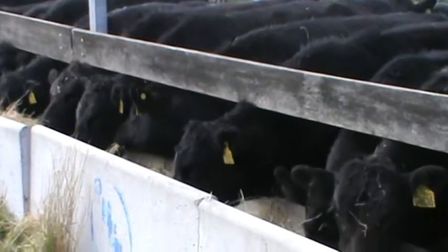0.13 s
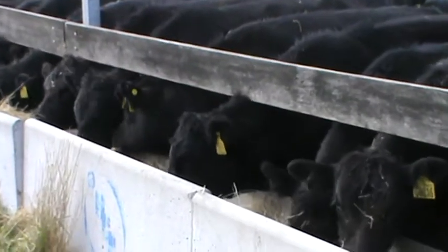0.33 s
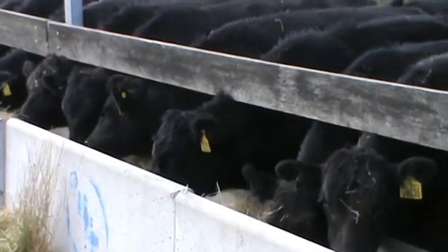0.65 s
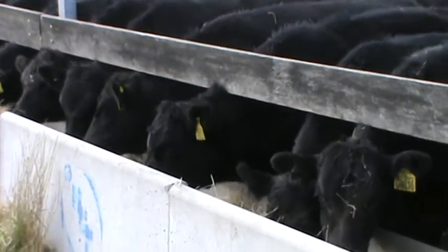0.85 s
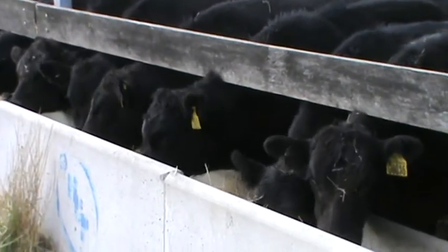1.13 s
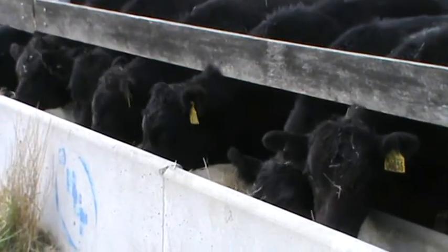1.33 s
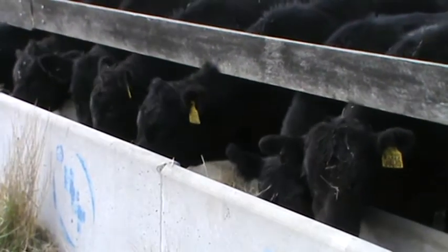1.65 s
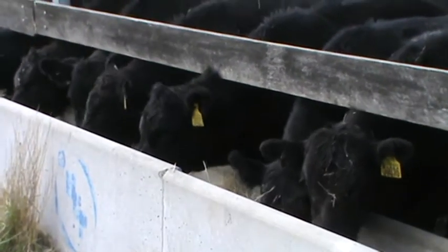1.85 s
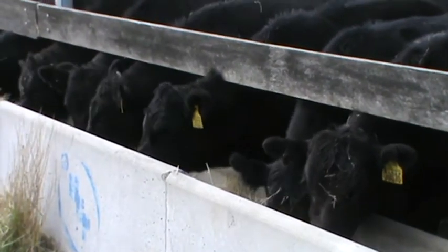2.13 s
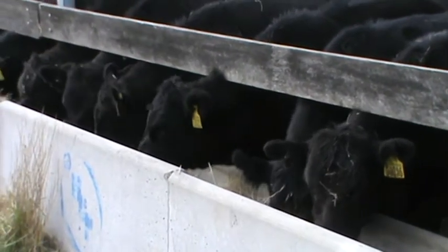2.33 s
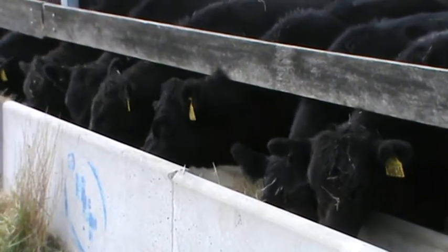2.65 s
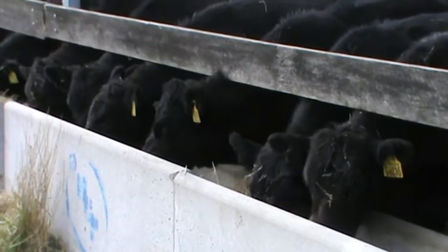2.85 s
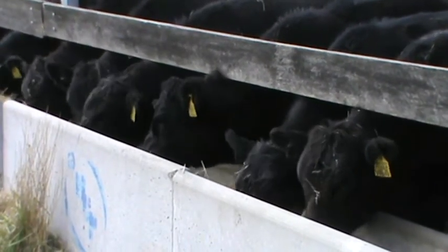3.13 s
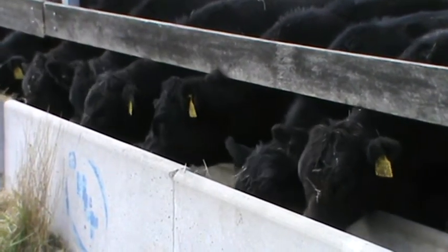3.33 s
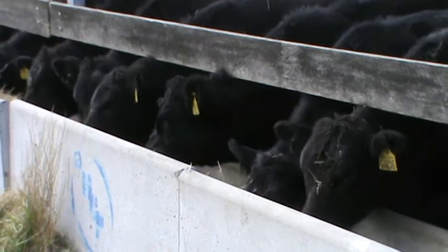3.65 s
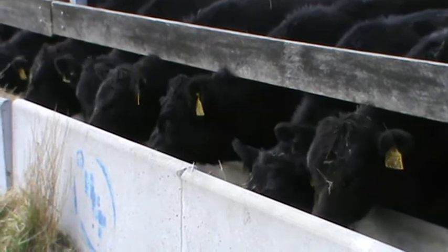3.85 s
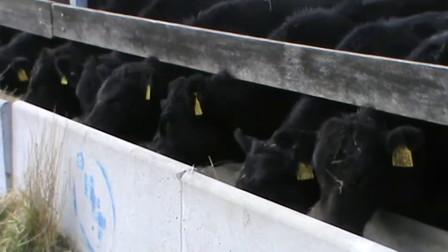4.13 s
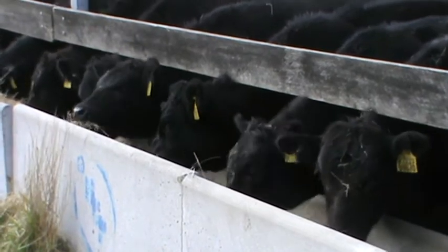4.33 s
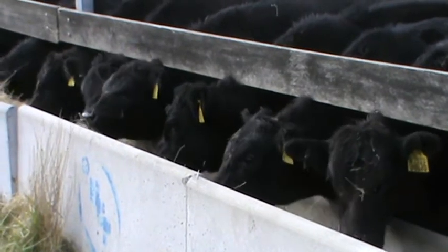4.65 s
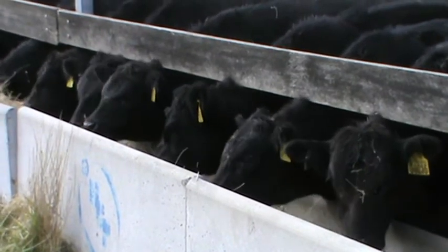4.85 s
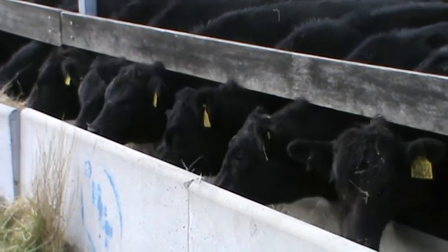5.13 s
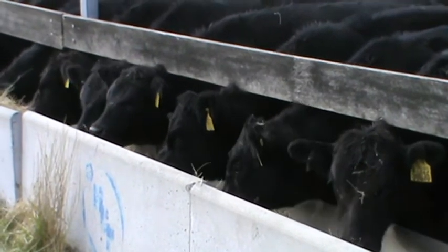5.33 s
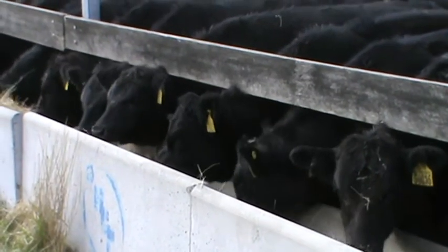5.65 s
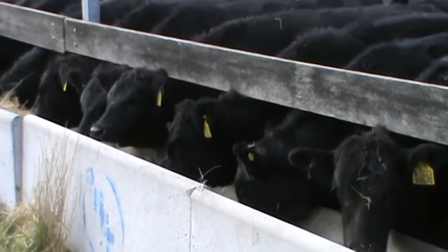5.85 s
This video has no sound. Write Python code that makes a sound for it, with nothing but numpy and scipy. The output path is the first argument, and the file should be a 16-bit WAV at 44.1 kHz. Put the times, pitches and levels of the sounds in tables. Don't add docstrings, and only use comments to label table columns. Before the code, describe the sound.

A young cow bawls loudly on the left, then another gives a lower drawn-out moo, amid wind buffeting and feed rustles in a yard.

```python
import sys
import numpy as np
from scipy import signal
from scipy.fft import rfft, irfft, next_fast_len
from scipy.io import wavfile
from scipy.ndimage import uniform_filter1d

SR = 44100
rng = np.random.default_rng(int(sys.argv[2]) if len(sys.argv) > 2 else 0)


def store_pcm(level_fs):
    pcm = np.round(np.clip(level_fs, -1, 1) * 32767).astype(np.int16)
    wavfile.write(sys.argv[1], SR, np.atleast_2d(pcm).T)


def how_loud(loudness_db):
    steps = np.asarray(loudness_db, float) / 20
    return 10 ** steps


N = 264159
HOP = 128


def rms_one(x):
    return x / np.sqrt(np.mean(x ** 2) + 1e-20)


def at_hz(points, hz):
    points_hz, values = np.transpose(points)
    return np.interp(np.log(hz), np.log(points_hz), values)


def along(rows, t):
    s, *columns = np.transpose(rows)
    return [np.interp(t, s, c) for c in columns]


def span(rows):
    s = np.transpose(rows)[0]
    start = int(s[0] * SR)
    t = np.arange(start, int(s[-1] * SR)) / SR
    edges = np.clip(np.minimum(t - s[0], s[-1] - t) / 0.012, 0, 1)
    return start, along(rows, t), edges


def place(x, start):
    return np.pad(x, (start, N - start - len(x)))


def band(x, low_hz, high_hz):
    edges_hz = [low_hz, min(high_hz, SR / 2.2)]
    return signal.sosfilt(signal.butter(2, edges_hz, "band", fs=SR, output="sos"), x)


def drift(rate_hz, size=N):
    r = np.exp(-2 * np.pi * rate_hz / SR * 20)
    noise = rng.standard_normal(size // 20 + 3002)
    slow = signal.lfilter([1], [1, -2 * r, r * r], noise)[3000:]
    return np.interp(np.arange(size) / 20, np.arange(len(slow)), rms_one(slow - slow.mean()))


def causal(log_gain):
    quefrency = irfft(log_gain, axis=0)
    half = len(quefrency) // 2
    quefrency[1:half] *= 2
    quefrency[half + 1:] = 0
    return np.exp(rfft(quefrency, axis=0))


def yard():
    # hz, density_db_per_hz
    spectrum = [(13, -37), (22, -2), (105, -1.5), (181, 3), (289, -1.5), (435, -3), (840, 1.5),
                (1860, -5.5), (2070, -4.5), (3040, -10), (7300, -19), (12600, -27.5), (14100, -21.5),
                (15300, -15)]
    # start_s, level_db
    level_rows = [(0.0, -55), (0.33, -57), (0.78, -51.5), (2.5, -54.5), (3.1, -52), (3.639, -54.5),
                  (3.8, -57), (4.99, -61.5), (5.99, -59.5)]
    # hz, likeness_0_to_1
    likeness = [(60, 1), (380, 0.42), (950, 0.32), (2400, 0.013), (6000, 0.032), (9000, 0.62), (12000, 1)]
    out, together = 0, drift(30)
    edges_hz = 20 * 2 ** np.arange(0, 9.7, .4)
    white = rng.standard_normal((2, 2, N))
    for k, (low, high) in enumerate(zip(edges_hz, edges_hz[1:])):
        mid, side = band(white[k % 2], low, high)
        hz = np.sqrt(low * high)
        alike = np.clip(at_hz(likeness, hz), 0, 0.98)
        patchy_db = 1.1 / (1 + hz / 3000)
        gain = how_loud(at_hz(spectrum, hz) + patchy_db * (together + drift(36)))
        out = out + gain * (np.sqrt(1 + alike) * mid + np.sqrt(1 - alike) * side * [[1], [-1]])
    level_db, = along(level_rows, np.arange(N) / SR)
    return rms_one(out) * how_loud(level_db + 10)


def hiss():
    noise = rng.standard_normal(N) + 0.37 * rng.standard_normal((2, N))
    return how_loud(-61.5) * rms_one(band(noise, 8500, 15000))


def whine():
    # pitch_hz, level_db
    tones = [
        (15525, -76),
        (15625, -64),
    ]
    out, t = np.zeros(N), np.arange(N) / SR
    for hz, db in tones:
        level_db = db + .8 * drift(7.2) + 1.7 * drift(45)
        out += np.sqrt(2) * how_loud(level_db) * np.sin(2 * np.pi * hz * t)
    return out


def insect_trill():
    # pitch_hz, level_db, end_s
    trill = (6650, -62, .17)
    hz, db, end_s = trill
    t = np.arange(N) / SR
    fade = np.clip((end_s - t) / .005, 0, 1)
    return how_loud(db + 3.5 * drift(60)) * np.sin(2 * np.pi * hz * t) * fade


def rustles():
    # start_s, peak_db, centre_hz, half_width_octaves, decay_t60_s
    events = [(.0, -33, 1110, 0.33, 0.076), (0.165, -41, 2250, 0.54, 0.026), (.43, -52, 6860, 0.25, 0.28),
              (.45, -57, 9700, .3, .25), (0.866, -27, 170, 2.7, 0.1), (1.699, -23, 133.1, 0.6, 0.3),
              (2.315, -23.5, 232, 0.33, 0.13), (2.6772, -25, 1670, 0.64, 0.048),
              (1.94, -47, 10800, 0.36, 0.076), (4.072, -39, 800, 0.95, 0.044),
              (4.13, -44.5, 4560, 1.3, 0.098), (4.272, -47, 940, 1.9, 0.033),
              (4.326, -42, 624, 0.17, 0.093), (4.569, -45.5, 900, 0.72, 0.058),
              (4.643, -39, 690, 1.05, 0.078), (4.995, -39, 1510, 0.26, 0.026),
              (5.45, -47.5, 3000, 1.2, 0.17), (5.586, -45.5, 736, 0.42, 0.056),
              (5.874, -35.5, 800, 0.99, 0.11)]
    out, t = np.zeros((2, N)), np.arange(int(.2 * SR)) / SR
    for s, db, hz, octaves, t60 in events:
        rise_s = min(t60 / 6, 2 * t60 ** 2)
        noise = rng.standard_normal((3, len(t)))
        noise = noise[0] + 1.25 * noise[1:]
        burst = rms_one(band(noise, hz / 2 ** octaves, hz * 2 ** octaves))
        burst *= np.minimum(t / rise_s, 1) * how_loud(db + 2.5 - 60 * t / t60)
        i = int(s * SR)
        out[:, i:i + len(t)] += burst[:, :N - i]
    return out


def buffeting(side):
    # start_s, peak_db, left_minus_right_db, hold_s
    gust_rows = [(0, -53, -4, .01), (0.514, -36, -5, 0.017), (0.642, -65, 8, 0.0059),
                 (0.87, -18, 1.5, 0.0088), (1.13, -35.5, 6, 0.0083), (1.56, -21, 4, 0.04),
                 (1.7, -18.5, -6.5, 0.095), (1.794, -21.5, -7.5, 0.0088), (1.944, -31.5, 0, 0.12),
                 (2.153, -34, 7, 0.0094), (2.244, -28.5, 1, 0.022), (2.327, -21.5, -9, 0.0094),
                 (2.4, -24.5, -2, 0.023), (2.5, -36, -8, 0.099), (2.785, -27.5, 1, 0.0085),
                 (2.936, -33, -4.5, 0.0087), (3.058, -36, -21.5, 0.026), (3.106, -30, 2, 0.0098),
                 (3.275, -41.5, -5, 0.0089), (3.404, -38, 4, 0.0078), (3.511, -35.5, 3, 0.08),
                 (3.597, -38, -7, 0.039), (3.95, -46.5, -1, 0.03), (4.252, -61, -4, 0.027),
                 (4.822, -47, 0, 0.055), (5.058, -44, -1, 0.069), (5.298, -46, -0.5, 0.13),
                 (5.74, -59, 3, 0.046)]
    # start_s, level_db
    breeze = [(0, -75), (.4, -42.5), (.8, -45), (1.4, -47), (2.55, -36), (3.2, -44), (3.75, -83),
              (4.95, -67), (5.99, -72)]
    rise_db_per_s, fall_db_per_s = 359, 222
    t = np.arange(0, N, HOP) / SR
    s, db, pan_db, hold_s = np.transpose(gust_rows)[:, :, None]
    rising = rise_db_per_s * (s - t)
    falling = fall_db_per_s * np.maximum(t - s - hold_s, 0)
    gusts = db + side * pan_db - np.maximum(rising, falling)
    return np.interp(np.arange(N) / SR, t, np.maximum(gusts.max(0), along(breeze, t)[0]))


def wind():
    common, *own = rng.standard_normal((3, N))
    out = []
    for side, noise in zip((.5, -.5), own):
        air = 0.37 * common + .5 * noise
        level = buffeting(side) + 2.3 * drift(15)
        low = rms_one(band(band(air, 60, 151), 43, 234)) * how_loud(level - 3.5)
        high_db = level - 11 + 0.39 * (level + 33.5)
        high = rms_one(band(band(air, 109, 272), 91, 284)) * how_loud(high_db)
        deep_db = level - 12.5 - 0.28 * (level + 30.5)
        deep = rms_one(band(common + 0.3 * noise, 32, 57.5)) * how_loud(deep_db)
        out.append(deep + low + high)
    return np.array(out)


def voice(pitch_rows, effort_rows, mouth_rows, chest, bright):
    # start_s, end_s, swell_db, fade_s, falter_db
    nose_opens = (1.535, 2.16, 10.4, 0.031, 9.5)
    middling_db, chest_full_hz = -35, 104.3
    start, (pitch,), edges = span(pitch_rows)
    t = (start + np.arange(len(pitch))) / SR
    pitch = uniform_filter1d(pitch, size=700)
    effort, = along(effort_rows, t)
    stretch, opening, hoarse, push_db, lips = along(mouth_rows, t)

    begin, end, swell_db, fade, falter_db = nose_opens
    swell = swell_db * np.clip(np.minimum(t - begin, end - t) / fade, 0, 1)
    swell -= falter_db * np.exp(-((t - begin + fade) / fade) ** 2)

    base_db, effort_share, db_per_octave, tiring_db_per_s = chest
    chest_db = base_db + effort_share * (effort - middling_db) + swell
    chest_db += db_per_octave * np.log2(np.minimum(pitch, chest_full_hz) / 100)
    chest_db += tiring_db_per_s * (t - t[0])

    base_db, effort_share, opening_db = bright
    bright_db = base_db + effort_share * (effort - middling_db) + opening_db * opening
    bright_db = np.minimum(bright_db, effort + 2) + push_db
    return start, (pitch, chest_db, effort, bright_db, stretch, opening, hoarse, lips), edges


def throat_gain(hz, stretch, opening, lips, throat, split_hz, top_hz, damping, notch_hz, notch_width):
    lips_rule_above_hz = 1300
    leak = 0.05
    widening = np.maximum(1 + damping * (1 - np.clip(opening, 0, 1)), 1 / 4)
    tract = spread = 0
    for k, (centre_hz, width, open_db, closed_db, lift) in enumerate(throat):
        db = closed_db + (open_db - closed_db) * np.clip(opening, -1, 1)
        width = width * widening
        if centre_hz > lips_rule_above_hz:
            centre = centre_hz * (1 + lift * lips)
        else:
            centre = centre_hz * np.clip(stretch, .85, 1.15)
        ring = how_loud(db) * 1j * width * hz / (centre ** 2 - hz ** 2 + 1j * width * hz)
        sign = (-1) ** (k * (centre_hz < 3200))
        tract = tract + sign * ring
        spread = spread + abs(ring) ** 2 * (hz > split_hz[0])
    tract = np.sqrt(abs(tract) ** 2 + leak * spread)
    tract = tract * ((450 ** 2 - hz ** 2 + 70j * hz) / (450 ** 2 - hz ** 2 + 220j * hz)) ** 2
    notch_width = notch_width * (1 + 2.7 * np.clip(lips, 0, .4))
    off_notch = notch_hz ** 2 - hz ** 2
    tract = tract * (off_notch + 1j * notch_width * hz) / (off_notch + 380j * hz)
    return abs(tract / (1 - (hz / top_hz) ** 2 + 1j * hz / top_hz) ** 3)


def bawl(controls, throat, split_hz, count, jitter, breath_db, top_hz, damping, notch_hz, notch_width):
    start, (pitch, *parts_db, stretch, opening, hoarse, lips), edges = controls
    size = len(pitch)
    phase = 2 * np.pi * np.cumsum(pitch * (1 + jitter * hoarse * drift(86, size))) / SR
    hz = np.arange(1, count + 1)[:, None] * pitch[::HOP]
    tract = throat_gain(hz, stretch[::HOP], opening[::HOP], lips[::HOP], throat, split_hz, top_hz,
                        damping, notch_hz, notch_width)
    part = (hz > split_hz[0]) * 1 + (hz > split_hz[1])
    gain = np.zeros(hz.shape)
    for k, db in enumerate(parts_db):
        power = uniform_filter1d((tract ** 2 * (part == k)).sum(0) / 2, size=9)
        gain += (part == k) * how_loud(db[::HOP]) / np.sqrt(power + 1e-12)
    level = np.log(tract * gain + 1e-9)
    pulse = -causal(np.vstack([level[:1], level]))[1:]

    fine, n = np.arange(0, size + HOP, HOP / 2), np.arange(size)
    noise = rng.standard_normal((2, count, len(fine)))
    real, imaginary = np.sqrt(5) * uniform_filter1d(noise, size=5, axis=1)
    breath = how_loud(breath_db) * np.clip(hoarse, 0, 1 / 6) * (1 + 2 * np.clip(opening, 0, 1)) / 3
    out = np.zeros(size)
    for k, row in enumerate(pulse):
        puff = np.interp(n, fine, real[k] + 1j * imaginary[k]) * min(k / 9, 2) ** 0.95
        wander_db = 1.4 * min(k / 9, 1) * drift(5.3, size)[::HOP]
        line = np.interp(n, n[::HOP], row * how_loud(wander_db)) * (1 + breath * puff)
        lag = .001 * k ** 2
        out += np.real(line * np.exp(1j * ((k + 1) * phase - lag)))
    return place(out * edges, start)


def to_ports(x, balance, lag_samples):
    size = 2 * next_fast_len(N // 2 + SR)
    hz = np.arange(size // 2 + 1) * SR / size + 1e-3
    ratio = how_loud(-at_hz(balance, hz))

    def late(s):
        return np.exp(-2j * np.pi * hz * s)

    def sheds():
        echoes = sum(how_loud(-21 - 27.3 * s) * late(s) for s in rng.uniform(.015, .1, 9))
        return echoes / (1 + 1j * hz / 2500)

    left = causal(np.log(2 / (1 + ratio))) * late(lag_samples / SR) + sheds()
    right = causal(np.log(2 * ratio / (1 + ratio))) * (1 + 0.11 * late(0.00126)) + sheds()
    return irfft(rfft(x, size) * np.array([left, right]), size)[:, :N]


def first_calf():
    # start_s, pitch_hz
    fold_pitch = [(.2, 66), (.45, 81.9), (.62, 95), (.7, 100.2), (.82, 104.8), (.97, 113.1),
                  (1.03, 115.7), (1.108, 116.3), (1.218, 115), (1.307, 115.8), (1.505, 126.1), (1.594, 128.3),
              (1.649, 132.9), (1.672, 130.2),
                  (1.772, 131.9), (1.852, 131.3), (1.91, 134.6), (1.982, 136.5), (2.092, 129.7), (2.12, 127.8),
               (2.17, 118.9), (2.3, 87.76)]
    # start_s, level_db
    effort = [(0.199, -76), (.3, -46.5), (0.679, -43), (.73, -32.5), (0.979, -21), (1.7, -18.5),
              (2.17, -19), (2.235, -28), (2.265, -51)]
    # start_s, throat_stretch_ratio, opening_0_to_1, hoarseness_0_to_1, bright_push_db, lips_drawn_0_to_1
    mouth = [(.29, 0.86, 0.4, 0.2, -2, 0.79), (.5, 0.89, 0.24, 0.2, 1, 0.46),
             (.7, 0.87, 0.56, 0.4, -1.5, 0.3), (0.959, 0.9, 1, 0.36, 2.5, 0.08),
             (1.251, 0.99, 0.95, 0.16, 1.5, 0.11), (1.5, 0.92, 1, 0.4, 0, 0.12),
             (1.84, 0.946, 0.94, 0.31, -2.5, 0.14), (2.18, 0.96, 0.97, 0.14, -1, 0.09),
             (2.3, 0.9, 1, 0.2, -7, 0.22)]
    # centre_hz, width_hz, open_db, closed_db, drawn_lips_rise_share
    throat = [(280, 19.5, 11, -1, 0), (623, 13.3, -1.5, 14, 0), (800, 374, -7.5, 0, 0),
              (1113, 56, 9, 10, 0), (1403, 30.6, -1, -39, 0.15), (1844, 78, -7, 1.5, 0.29),
              (2279, 41, -5, -10, 0.15), (2565, 79, -8, -17, 0), (2945, 51, -16, -19.5, 0.31),
              (3305, 122, -21, -27, 0.18), (3767, 47, -22.5, -37, 0.058), (1564, 84, -12.5, -54, .05),
              (111, 57, -21, -7, 0)]
    # hz, left_minus_right_db
    balance = [(60, 9.5), (110, 1), (200, 2.5), (380, -1), (700, 13), (1290, 10), (2380, 13), (4400, 9.5),
               (8120, 15), (15000, 25)]
    chest = (-39, 0.1, 58, 0.97)   # base_db, effort_share, db_per_octave, tiring_db_per_s
    bright = (-36.5, 0.51, -1.73)   # base_db, effort_share, opening_db
    controls = voice(fold_pitch, effort, mouth, chest, bright)
    call = bawl(controls, throat, (470, 1750), count=58, jitter=.018, breath_db=-3.5, top_hz=4000,
                damping=0.59, notch_hz=1600, notch_width=310)
    return to_ports(call, balance, lag_samples=-2.5)


def hum(rows, head, count=4):
    start, (pitch, db), edges = span(rows)
    phase = 2 * np.pi * np.cumsum(pitch * (1 + 0.01 * drift(31.6, len(pitch)))) / SR
    out = sum(how_loud(db + at_hz(head, k * pitch)) * np.sin(k * phase) for k in range(1, count + 1))
    return place(np.sqrt(2) * out * edges, start)


def far_hums():
    # start_s, pitch_hz, level_db
    rising = [(.85, 121.4, -28), (.92, 124.6, -1.5), (1.01, 131.3, -1), (1.11, 152.8, -2.5),
              (1.23, 182.6, 0.5), (1.4, 188.1, 3.5), (1.51, 189.8, 5.5), (1.6, 184, 3), (1.7, 164, -1)]
    level = [(2.45, 232.5, -58), (2.5, 230.5, -45), (2.574, 244.7, -43.5), (2.784, 257.2, -31.5),
             (2.952, 263.8, -23.5), (3.1, 267.5, -23.5), (3.3, 266.5, -24.5), (3.37, 241, -41.5),
             (3.42, 235, -43)]
    faint = [(2.6, 232, -46), (2.75, 231, -49), (2.95, 225.5, -46), (3.1, 214.4, -48), (3.15, 212.3, -59)]
    dropping = [(2.45, 112, -49), (2.6, 125, -46.5), (2.78, 129.3, -40.5), (3.0, 134.6, -54),
                (3.07, 133, -47), (3.14, 124.3, -44), (3.22, 118.6, -44), (3.27, 118.5, -50)]
    # hz, gain_db
    rising_head = [(135, -41), (190, -34.5), (255, -21.5), (290, -29), (320, -38), (400, -61), (570, -57),
                   (740, -43)]
    level_head = [(250, 0), (500, -46), (790, -19.5), (1040, -22)]
    faint_head = [(225, -29), (450, -43), (680, 3.5), (900, -35)]
    dropping_head = [(130, -11), (260, -3), (380, -7.5), (520, -30), (650, -8.5), (770, 1), (900, -12),
                     (1030, -19)]
    out = hum(rising, rising_head) + hum(level, level_head)
    return out + hum(faint, faint_head) + hum(dropping, dropping_head, count=8)


def grunt(rows, low_hz, high_hz, skirt):
    start, (db,), edges = span(rows)
    noise = band(rng.standard_normal(len(db)), low_hz, high_hz)
    noise = rms_one(band(noise, low_hz / skirt, high_hz * skirt))
    return place(noise * how_loud(db + 5) * edges, start)


def far_grumbles():
    # start_s, level_db
    grumble = [(1.1, -50), (1.142, -46), (1.25, -37.5), (1.292, -74), (1.376, -60), (1.404, -29),
               (1.464, -34), (1.502, -70), (1.52, -45)]
    rasp = [(1.12, -36), (1.2, -44.5), (1.3, -43), (1.36, -51), (1.52, -52), (1.57, -37.5), (1.72, -40),
            (1.77, -40), (1.81, -52)]
    return grunt(grumble, 240.5, 282, skirt=1.3) + grunt(rasp, 652.6, 817, skirt=1.09)


def thumps():
    # start_s, peak_db, start_hz, end_hz, length_s
    events = [
        (1.678, -17.5, 162, 91, 0.037),
        (2.391, -22.5, 172, 63.7, 0.048),
        (5.045, -45, 111, 60.3, .06),
        (5.124, -36, 120, 60, 0.018),
        (5.414, -44, 120, 60, 0.027),
    ]
    out = np.zeros(N)
    for s, db, start_hz, end_hz, length in events:
        u = np.arange(int(length * SR)) / (length * SR)
        hz = end_hz + (start_hz - end_hz) * np.exp(-3.5 * u)
        swing = np.sin(np.pi * u ** 0.5) * np.sin(2 * np.pi * np.cumsum(hz) / SR)
        i = int(s * SR)
        out[i:i + len(u)] += how_loud(db) * swing
    return out


def ticks():
    # start_s, peak_db
    events = [
        (1.8131, -15.5),
        (1.8206, -25),
        (1.8219, -29),
        (2.6785, -28),
    ]
    clicks = np.full(N, 1e-18)
    for s, db in events:
        clicks[int(s * SR)] = 3 * how_loud(db)
    return band(band(clicks, 8800, 17330), 5600, 15000)


def second_calf():
    # start_s, pitch_hz
    drone = [(2.22, 94.46), (2.446, 97.96), (2.632, 101.6), (2.756, 101.5), (2.938, 104.9), (3.06, 106.1),
             (3.38, 103.4)]
    swell = [(3.479, 104.3), (3.539, 106.7), (3.631, 114.1), (3.701, 116.4), (3.76, 115.5), (3.815, 113.6),
             (3.839, 107.3), (3.88, 89.1)]
    creak = [(3.903, 74), (3.93, 68), (4.0, 62)]
    # start_s, level_db
    effort = [(2.219, -44.5), (2.42, -37.5), (2.6, -32.5), (2.9, -33.5), (3.07, -32), (3.84, -30),
              (3.9, -34), (3.949, -40.5), (4.0, -69)]
    # start_s, throat_stretch_ratio, opening_minus_1_to_1, hoarseness_0_to_1, bright_push_db,
    # lips_drawn_share
    mouth = [(2.25, 0.92, -0.27, 0.081, 9, 0.49), (2.36, 0.955, 0.55, 0.11, 0.5, 0.39),
             (2.59, 0.99, 0.4, 0.16, 1.7, 0.39), (2.85, 0.96, 0.98, 0.29, 0.2, 0.24),
             (3.4, 1.005, 0.94, 0.09, -0.3, 0.23), (3.65, 0.97, 0.98, 0.062, 1.5, .01),
             (3.86, 0.998, 0.96, 0.12, 1, 0.24), (3.92, 0.89, -0.073, 0.06, 1, 1),
             (3.96, 1.08, -0.6, 0.1, -18, 1.05)]
    # centre_hz, width_hz, open_db, closed_db, drawn_lips_rise_share
    throat = [(338, 62, 1, -6.5, 0), (669, 108, 6, -28.5, 0), (1087, 82, 15, -13.5, 0),
              (1553, 38, 12.5, -29, 0.013), (6030, 980, -25.5, -64, 0.028), (2042, 81, 9.5, -1, 0.16),
              (2376, 275, 0, -8, 0.0046), (2780, 320, 3.5, -23, 0.094), (3444, 57, 3, -22, 0.022),
              (4025, 86, -2.5, -31, 0.0093), (4495, 69, -8.5, -39, 0.05), (2854, 67, -2.5, -7.5, 0.11),
              (10200, 170, -29.5, -74, 0.072), (206.5, 13.7, -2.5, -4.5, 0)]
    # hz, left_minus_right_db
    balance = [(60, 21), (110, 7), (200, 0.5), (380, 0.5), (700, 9.5), (1290, 10), (2380, 14), (4400, 11.5),
               (8120, 5), (15000, 7)]
    chest = (-36, 0.74, 0, -4.5)   # base_db, effort_share, db_per_octave, tiring_db_per_s
    bright = (-46.5, 0.65, 10.53)   # base_db, effort_share, opening_db
    controls = voice([*drone, *swell, *creak], effort, mouth, chest, bright)
    call = bawl(controls, throat, (470, 1800), count=104, jitter=.015, breath_db=-4, top_hz=14000,
                damping=-0.57, notch_hz=1920, notch_width=150)
    return to_ports(call, balance, lag_samples=-3.5)


def scene():
    background = yard() + hiss() + whine() + insect_trill()
    trough = rustles() + ticks()
    air = wind() + thumps()
    calves = first_calf() + second_calf()
    herd = far_hums() + far_grumbles()
    return background + trough + air + calves + herd


def roll_off(x):
    return signal.sosfilt(signal.butter(12, 17010, fs=SR, output="sos"), x)


def record(dry):
    low_pass = signal.ellip(10, .5, 60, 15850, fs=SR, output="sos")
    mix = signal.sosfilt(low_pass, dry)
    return roll_off(mix)


dry = scene()
out = record(dry)
store_pcm(out)
```